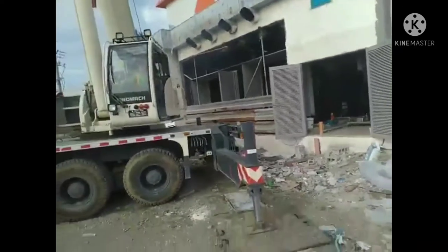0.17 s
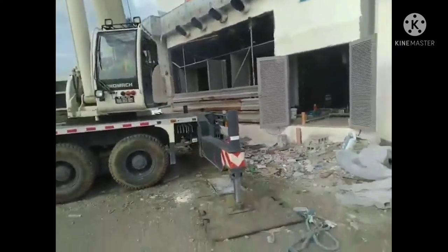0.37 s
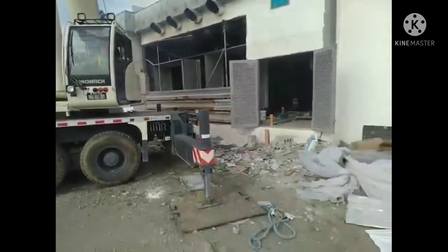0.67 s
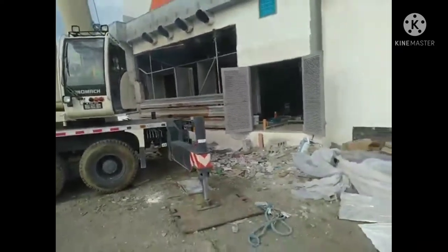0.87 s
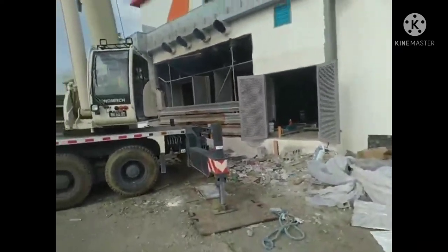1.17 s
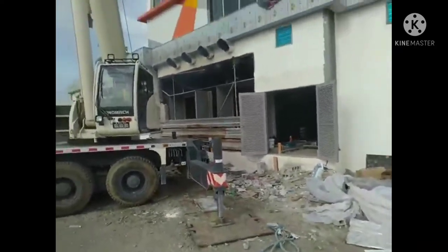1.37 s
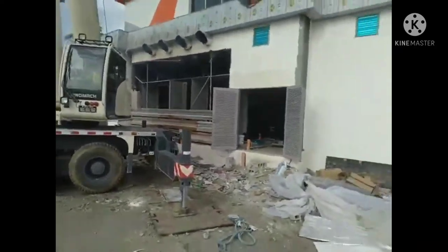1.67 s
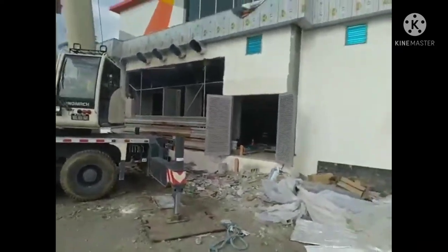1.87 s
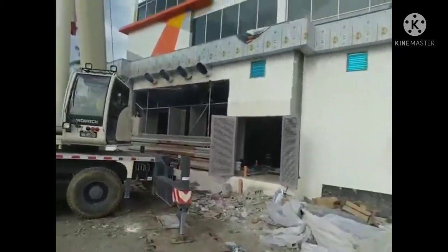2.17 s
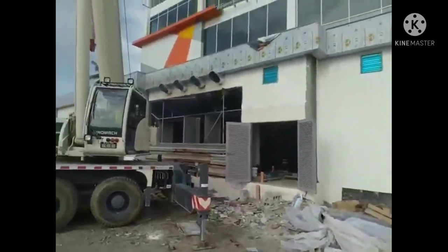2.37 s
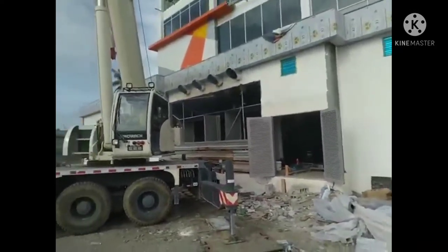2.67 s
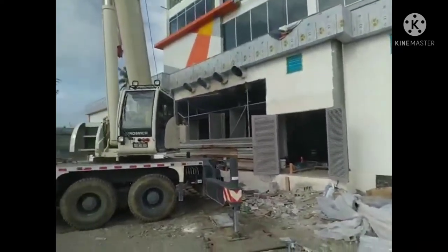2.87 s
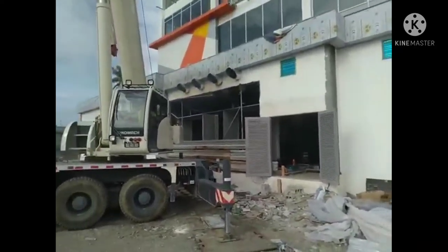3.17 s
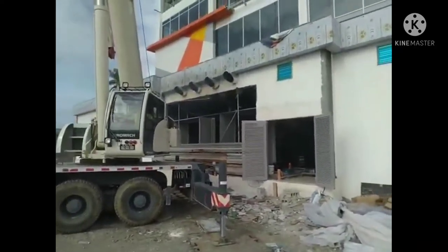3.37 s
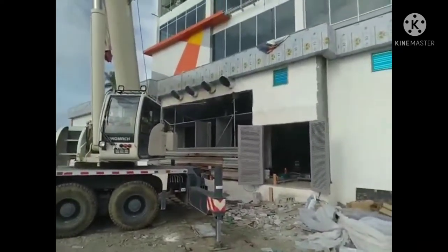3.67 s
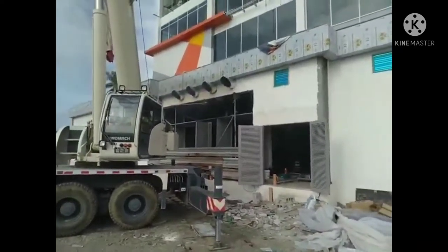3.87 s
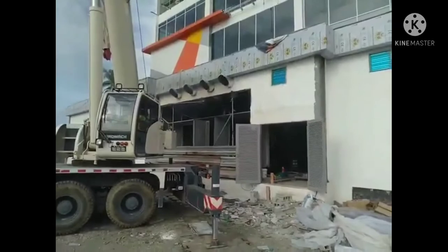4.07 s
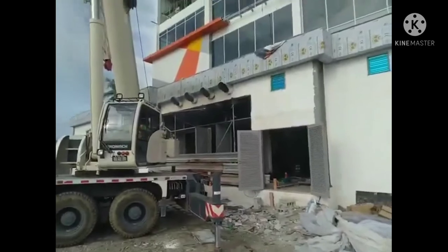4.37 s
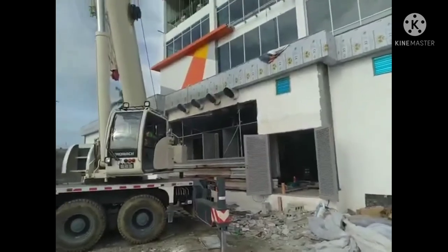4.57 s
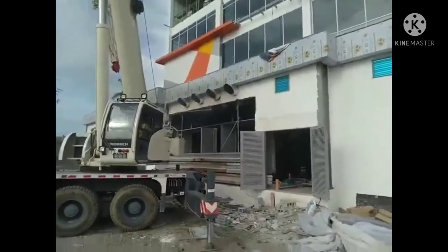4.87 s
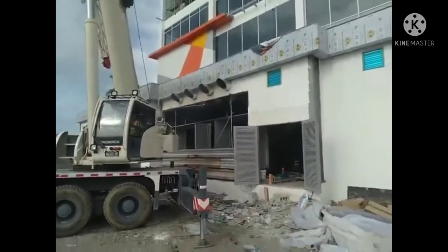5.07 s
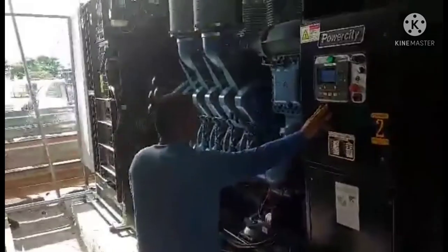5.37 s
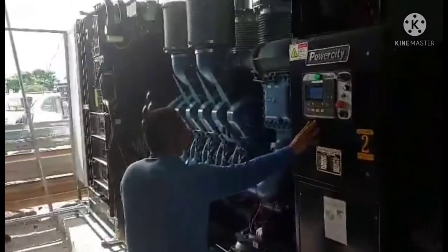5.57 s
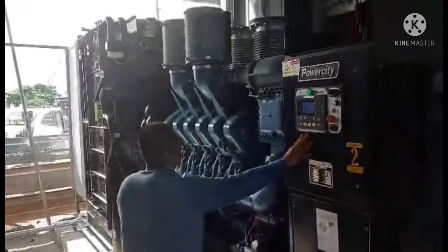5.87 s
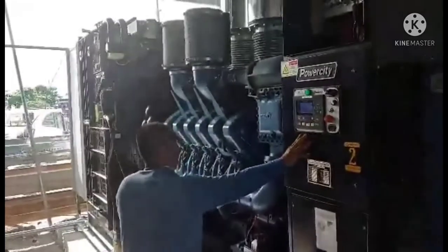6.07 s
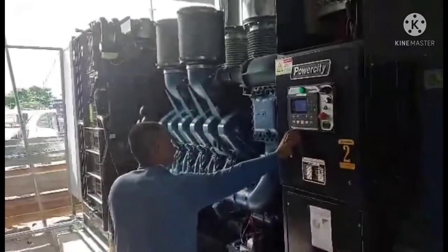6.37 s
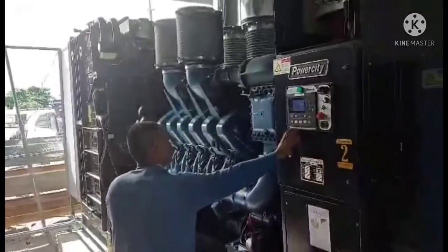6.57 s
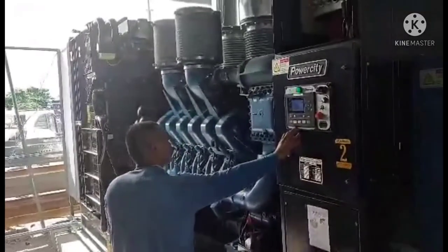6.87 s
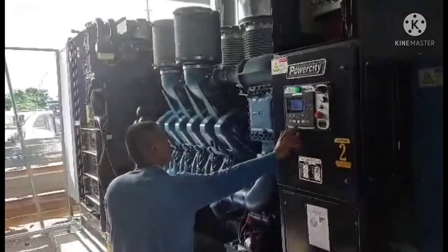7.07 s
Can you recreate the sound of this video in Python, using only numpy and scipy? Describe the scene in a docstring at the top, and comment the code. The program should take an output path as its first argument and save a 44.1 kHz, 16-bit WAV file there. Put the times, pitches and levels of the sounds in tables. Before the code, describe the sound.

A continuous fast diesel drone with blurred firing pulses fills a yard, mixed with fan hum and soft airy hiss, its middle tones swelling and thinning as the listener shifts position. Then a hard change, barely overlapped: a large engine idling at arm's length indoors, wider and brighter, its metallic clatter and ticking repeating every cycle over low rumble and blowing air until the end.

```python
"""Plant yard, then engine room: a diesel generator throbs behind open doors, heard from the yard with its fans;
then the scene changes to a big diesel idling at arm's length, its clatter repeating with every cycle.
Tones locked to the crank make the exhaust and block lines; free-running tones make the fans and gears.
Shaped noise makes gas and air, its level pulsed by firings or strokes; one looped noise cycle makes the clatter.
"""
import sys
import numpy as np
from scipy import signal
from scipy.fft import rfft, irfft
from scipy.io import wavfile
from scipy.ndimage import uniform_filter1d

SR = 44100
rng = np.random.default_rng(int(sys.argv[2]) if len(sys.argv) > 2 else 0)


def store_wav(level_fs):
    """Save 16-bit WAV to argv[1]."""
    pcm = np.round(np.clip(np.atleast_2d(level_fs), -1, 1) * 32767)
    wavfile.write(sys.argv[1], SR, pcm.T.astype(np.int16))


N = 318402

# Source levels below are relative: envelopes and mix gains follow.
YARD_CYCLE_HZ, HALL_CYCLE_HZ = 15.0, 6.667  # four-stroke cycles at 1800 and 800 rpm

# Exhaust lines: (multiple of cycle rate, level in line with doors [dB], change furthest aside [dB])
YARD_EXHAUST_LINES = [(2, -52, 1.5), (3, -38.5, 1), (4, -25.5, -2.5), (5, -32, 0), (6, -23.5, 0),
                      (7, -31.5, -1.5), (8, -21.5, -8), (9, -18, 4.5), (12, -31, -5.5), (13, -34, -2.5),
                      (14, -20, -9), (15, -30.5, 3.5), (16, -29.5, -1), (17, -30, -14), (18, -37, 0),
                      (20, -32, -4.5), (21, -26.5, .5), (22, -39.5, 3), (23, -38, 2.5), (26, -45, -2),
                      (30, -33, -5.5), (31, -34.5, 0), (32, -38.5, -2), (33, -41.5, 2), (35, -38, -1.5),
                      (43, -43.5, 0)]
# Engine block lines: (multiple of cycle rate, level [dB])
HALL_BLOCK_LINES = [(6, -35.5), (9, -46), (15, -36), (16, -24), (17, -24), (18, -18), (20, -31),
                    (22, -27.5), (24, -31), (26, -36), (27, -33), (34, -41), (36, -20), (42, -26.5),
                    (45, -30.5), (48, -21.5), (49, -27.5), (51, -30), (58, -31), (63, -42), (67, -37),
                    (72, -33.5), (76, -28), (81, -34), (90, -42), (108, -32), (110, -37), (117, -39),
                    (123, -37), (126, -29.3), (138, -40), (160, -38), (166, -32), (174, -34.5), (198, -38)]
# Delay in pipes and walls: (lag [cycles], further lag per multiple [cycles])
YARD_DELAY_CYCLES = (.08, .213)
HALL_DELAY_CYCLES = (.5, .3333)
# Fan hum: (frequency [Hz], level [dB])
YARD_FAN_TONES = [(192, -24), (384, -39)]
HALL_FAN_TONES = [(67.5, -32), (85.5, -25.5)]
# Gear whine: (frequency [Hz], level [dB])
YARD_GEAR_TONES = [(959, -46), (1080, -45.5), (1158, -41.5), (1319, -58.5), (1692, -54)]
# Turbulent gas and air: (frequency [Hz], density [dB per Hz])
YARD_ROAR_SPECTRUM = [(32, -75), (75, -47), (115, -46.5), (148, -39), (175, -48.5), (260, -47.5),
                      (335, -42.5), (420, -53.5), (690, -48.5), (850, -54.5), (1400, -60), (1900, -66),
                      (2850, -65.5), (3500, -76.5), (4700, -80), (7700, -101), (12500, -100)]
HALL_AIR_SPECTRUM = [(28, -62), (70, -42.5), (150, -40), (205, -43), (270, -42.5), (320, -42), (450, -50.5),
                     (900, -55), (1300, -55.5), (1650, -60), (1950, -58), (2600, -56.5), (3500, -63.5),
                     (4700, -68), (7000, -71), (12000, -81)]
# Gear and injector rattle in the yard: (frequency [Hz], density [dB per Hz])
YARD_CLATTER_SPECTRUM = [(200, -76), (400, -54.5), (600, -58.5), (850, -61), (1400, -69), (2700, -75),
                         (3600, -104.5)]
# Valve gear and combustion knock: (frequency [Hz], density [dB per Hz])
HALL_CLATTER_SPECTRUM = [(28, -71.5), (70, -59), (160, -54), (300, -54), (420, -49.5), (600, -48),
                         (800, -49.5), (950, -49), (1150, -52.5), (1340, -52), (1600, -62.5), (1950, -59.5),
                         (2300, -60), (2600, -61.5), (4000, -76.5)]
# Covers and pipes that ring in the noise: (frequency [Hz], width [Hz], lift [dB])
YARD_COVER_RINGS = [(492, 80, 4.5), (1663, 73, 4), (2136, 240, 4), (6220, 620, 4.5), (10440, 1950, 6.5)]
HALL_COVER_RINGS = [(1950, 100, 6.1), (2576, 120, 3.4), (2635, 78, 3.2), (4080, 740, 4.1), (5200, 440, 2.9),
                    (6350, 450, 2.8), (10600, 3600, 5.2)]
# Stereo field: (frequency [Hz], side minus mid [dB], left minus right [dB])
YARD_STEREO = [(35, -18, 0), (55, -14, 0), (95, -28, .2), (160, -27, 0), (250, -23, .2), (340, -16, .5),
               (470, -13.5, .5), (620, -17, .5), (880, -12, 1), (1170, -6, 2), (1700, -2, 4),
               (2400, -2.5, 4.5), (3900, 0, 4), (12000, 0, 4)]
HALL_STEREO = [(60, -17, 2.2), (120, -15.5, 2.4), (165, -11.5, 2.5), (240, -14, 2.5), (330, -14.5, 2.5),
               (450, -9.5, 2.5), (600, -6, 2.5), (840, -5.5, 2.8), (1250, .5, 3.2), (2200, -1, .5),
               (5000, 0, -1.4), (11000, .3, 1.4)]
EXHAUST_STEREO = [(45, -32, .2), (135, -43, .2), (210, -31, .2), (320, -18, .3), (500, -14, .5)]  # low lines reach both ports alike
# Strength of the six knocks of a cycle: (strength [dB])
YARD_KNOCK_SIZES_DB = [11, 13, -13, -21.5, 2.5, -1.5]
# Valve and injector strokes: (share of cycle, strength in mids [dB], strength in treble [dB])
HALL_STROKE_ANGLES = [(.006, 7, -9), (.158, 2, -9), (.33, 1, 1), (0.485, -1, 11), (.59, -1, -1),
                      (.68, -12, 6), (.845, 8, -9), (.965, 1, -12)]
# Listener steps aside and part of the way back: (time [s], 0 in line with doors to 1 furthest aside)
LISTENER_ASIDE = [(0, 0.12), (.8, 0.059), (2.2, 0.77), (4.3, 0.89), (5.4, 0.53)]
# Gain at the two listener positions: (in line [dB], furthest aside [dB])
ROAR_ASIDE_DB = (1.05, -2.5)
WHINE_ASIDE_DB = (5, -1)
HUM_ASIDE_DB = (1.5, 2.8)
# Yard treble gain: (time [s], level [dB])
YARD_TREBLE_LEVEL = [(0, 0), (1.3, -0.4), (2.2, -1.7), (3.3, -1.5), (4.7, -0.6), (5.4, 0.7)]
# Resonant bands: (frequency [Hz], width [Hz])
YARD_LIFT_BANDS = [(372, 49), (485, 96), (755, 140), (2080, 910)]
HALL_LIFT_BANDS = [(1960, 250), (2620, 370)]
# Band levels as the listener moves: (time [s], then level [dB] of each of four bands, low to high)
YARD_LIFT_LEVELS = [(0, -5, 2.5, -6, -2), (1.2, 1.5, 4.5, -5, -0.5), (2.1, -1.5, 3.5, -1, -2.5),
                    (3.1, 0, -1, 2, 1), (4.5, 9.5, -6.5, 2.5, 1), (5.4, -1, 1.5, 1.5, 1)]
# Ringing band levels: (time [s], lower band level [dB], upper band level [dB])
HALL_LIFT_LEVELS = [(5.5, 0, -7), (5.66, -2, 6.5), (5.92, -2, -4), (6.06, 2, 9), (6.24, 1, -7), (6.5, 0, 4),
                    (6.62, 0, 1), (6.88, 1, 3), (7.2, 3, -7)]
# Brief swell of fan hum: (time [s], half length [s], lift [dB])
YARD_HUM_SWELL = (0.31, 0.15, 5.6)
# Brief swells of engine room rumble: (time [s], half length [s], lift [dB])
HALL_RUMBLE_SWELLS = [(5.57, 0.025, 9.5), (6.25, 0.18, 6)]
# Faint, brief hiss: (time [s], half length [s], frequency [Hz], width [Hz], level [dB])
YARD_WISP = (2.23, .09, 6050, 450, -48.5)

GEAR_HUNT_SHARE, GEAR_WAVER_SHARE, GEAR_FLUTTER_HZ = .0016, .5, 18
YARD_TREBLE_THROB, HALL_RATTLE_THROB, HALL_CLATTER_THROB = .55, .95, .5  # exponents on the envelopes
YARD_GRAIN_DB, HALL_AIR_FLICKER_DB, HALL_RATTLE_FLICKER_DB = .8, .6, 1.3
STROKE_DECAY_S, STROKE_SCATTER_DB = .006, 2
HALL_RUMBLE_DB, HALL_TREBLE_DB = -.2, -.7
CUT_S, CUT_RISE_S = 5.505, .024
LEAD_S, LEAD_RISE_S, LEAD_DB = .089, .03, -12  # engine room is softly audible before the cut
YARD_HOLD_S, YARD_FADE_DB_PER_S = .03, 194
YARD_DB, HALL_DB = -2, -2.5
TOP_HZ = 12900


def undb(db):
    """Decibels to gain."""
    return 10 ** (np.asarray(db) / 20)


def curves(table):
    """Each column of a time table, sample by sample."""
    time_s, *columns = np.transpose(table)
    return [np.interp(np.arange(N) / SR, time_s, c) for c in columns]


def at(hz, table):
    """Each column of a frequency table, read on a log axis."""
    points_hz, *columns = np.transpose(table)
    return [np.interp(np.log(hz + 1e-6), np.log(points_hz), c) for c in columns]


def walk(rate_hz):
    """Random levels held 1 / rate_hz and slewed twice; spread near 1."""
    hold = int(SR / rate_hz)
    steps = np.repeat(rng.standard_normal(N // hold + 2), hold)
    slewed = uniform_filter1d(uniform_filter1d(steps, hold), hold)
    return 1.3 * slewed[:N]


def swell(centre_s, half_length_s, lift_db):
    """Smooth rise and fall of level, in dB."""
    return lift_db * np.exp(-((np.arange(N) / SR - centre_s) / half_length_s) ** 2)


def ramp(start_s, length_s):
    """Straight rise from 0 to 1."""
    return np.clip((np.arange(N) / SR - start_s) / length_s, 0, 1)


def aside_gain(ends_db, aside):
    """Gain that follows the listener from in line with the doors to furthest aside."""
    in_line_db, aside_db = ends_db
    return undb(in_line_db + (aside_db - in_line_db) * aside)


def ports(mid, side, hz, field):
    """Left and right from a shared part and a diffuse part."""
    side_db, pan_db = at(hz, field)
    side = side * undb(side_db)
    return np.array([(mid + side) * undb(pan_db / 2), (mid - side) * undb(-pan_db / 2)])


def colour(pair, spectrum, rings, field):
    """Shape two white signals with a spectrum and resonances; spread them over both ports."""
    hz = np.arange(N // 2 + 1) * SR / N
    db = at(hz, spectrum)[0]
    for centre_hz, width_hz, lift_db in rings:
        db = db + lift_db / (1 + (2 * (hz - centre_hz) / width_hz) ** 2)
    mid, side = rfft(pair) * undb(db) * np.sqrt(SR / 2)
    return irfft(ports(mid, side, hz, field), N)


def split(pair, hz):
    """Parts of a sound below and above a frequency."""
    low = signal.sosfiltfilt(signal.butter(2, hz, fs=SR, output="sos"), pair)
    return low, pair - low


def resonate(pair, hz, width_hz):
    """Pass one resonant band."""
    return signal.lfilter(*signal.iirpeak(hz, hz / width_hz, fs=SR), pair)


def lift_bands(pair, bands, levels):
    """Raise or lower each band by its own level curve."""
    for (hz, width_hz), db in zip(bands, curves(levels)):
        pair = pair + (undb(db) - 1) * resonate(pair, hz, width_hz)
    return pair


def scatter(pair, longest_s, share, count):
    """Fixed reflections off nearby surfaces, different at each port, ripple the spectrum."""
    lags = (rng.uniform(.1, 1, (2, count)) * longest_s * SR).astype(int)
    reflected = np.array([sum(np.roll(x, lag) for lag in row) for x, row in zip(pair, lags)])
    return (pair + share * reflected / np.sqrt(count)) / np.hypot(1, share)


def crank(hz, hunt):
    """Turns so far at a speed that hunts a little; hunt is a share of speed."""
    return np.cumsum(hz * (1 + hunt * walk(5))) / SR


def tone(turns, hz, db, field, waver, flutter_hz=6):
    """One line; reflections make it waver and reach the ports at any phase."""
    diffuse = np.exp(2j * np.pi * rng.random())
    wavering = 1 + waver * (walk(flutter_hz) + 1j * walk(flutter_hz))
    line = np.sqrt(2) * undb(db) * np.exp(2j * np.pi * turns) * wavering
    return ports(line.real, (line * diffuse).real, hz, field)


def order_line(turns, multiple, cycle_hz, db, delay, field, waver):
    """Line locked to the crank; the lag grows with the multiple."""
    multiple = round(multiple)
    lag, further_lag = delay
    delayed = turns - lag - further_lag * multiple
    return tone(multiple * delayed, multiple * cycle_hz, db, field, waver)


def knocks(turns, sizes_db, decay, depth):
    """Unit-power envelope: each firing swells the noise, then decays; decay is a share of the interval."""
    firing = turns * len(sizes_db)
    size = undb(sizes_db)[firing.astype(int) % len(sizes_db)]
    envelope = 1 + depth * size * np.exp(-(firing % 1) / decay)
    return envelope / np.sqrt(np.mean(envelope ** 2))


def strokes(turns, sizes_db, depth):
    """Unit-power envelope: parts strike at fixed crank angles and ring briefly, a little unevenly."""
    envelope = 1
    for (angle, *_), db in zip(HALL_STROKE_ANGLES, sizes_db):
        since = turns - angle + 1
        cycle_sizes = undb(db + STROKE_SCATTER_DB * rng.standard_normal(64))
        size = cycle_sizes[since.astype(int)]
        envelope = envelope + depth * size * np.exp(-(since % 1) / HALL_CYCLE_HZ / STROKE_DECAY_S)
    return envelope / np.sqrt(np.mean(envelope ** 2))


def impacts(turns, cycle_hz, orders):
    """One cycle of dense impacts, looped; its mid part leaves room for the strong lines."""
    size = 2 * int(SR / cycle_hz / 2)
    lines = np.exp(2j * np.pi * rng.random((2, size // 2 + 1)))
    lines[0, [round(k) for k, *_ in orders]] = 0
    cycles = irfft(lines) * np.sqrt(size)
    return np.array([np.interp(turns % 1 * size, np.arange(size), cycle) for cycle in cycles])


def wisp(centre_s, half_length_s, hz, width_hz, db):
    """Narrow noise band that swells and fades as a faint hiss."""
    band = resonate(rng.standard_normal((2, N)), hz, width_hz)
    return undb(db) * band / band.std() * np.exp(-((np.arange(N) / SR - centre_s) / half_length_s) ** 2)


def yard_clatter(turns, throb):
    """Gear and injector rattle: looped impacts, pulsed by firings and roughened at random."""
    grain = undb(YARD_GRAIN_DB * walk(120))
    pulsed = impacts(turns, YARD_CYCLE_HZ, YARD_EXHAUST_LINES) * throb * grain
    return colour(pulsed, YARD_CLATTER_SPECTRUM, YARD_COVER_RINGS, YARD_STEREO)


def yard_noise(turns, aside):
    """Turbulent gas and rattle pulsed by the firings."""
    throb = knocks(turns, YARD_KNOCK_SIZES_DB, decay=.51, depth=.16)
    white = rng.standard_normal((2, N))
    low, treble = split(colour(white, YARD_ROAR_SPECTRUM, YARD_COVER_RINGS, YARD_STEREO), hz=1490)
    rumble, body = split(low * uniform_filter1d(throb, size=150), hz=370)
    # cooling air flows on between firings, so the treble throbs less
    treble = scatter(treble * throb ** YARD_TREBLE_THROB, longest_s=.015, share=.47, count=8)
    treble = treble * undb(curves(YARD_TREBLE_LEVEL)[0])
    beamed = (body + yard_clatter(turns, throb)) * aside_gain(ROAR_ASIDE_DB, aside)
    return rumble + lift_bands(beamed + treble, YARD_LIFT_BANDS, YARD_LIFT_LEVELS)


def yard_fans(aside):
    """Wavering fan tones with one brief swell."""
    hum = sum(tone(crank(hz, hunt=.0014), hz, db, YARD_STEREO, waver=.19) for hz, db in YARD_FAN_TONES)
    return hum * aside_gain(HUM_ASIDE_DB, aside) * undb(swell(*YARD_HUM_SWELL))


def yard_gears(aside):
    """Gear whine, unsteady in pitch and level, beamed by the doors."""
    whine = sum(tone(crank(hz, GEAR_HUNT_SHARE), hz, db, YARD_STEREO, GEAR_WAVER_SHARE, GEAR_FLUTTER_HZ)
                for hz, db in YARD_GEAR_TONES)
    return whine * aside_gain(WHINE_ASIDE_DB, aside)


def yard_exhaust(turns, aside):
    """Crank-locked lines standing between walls; each swells or fades as the listener moves."""
    return sum(order_line(turns, k, YARD_CYCLE_HZ, db + change_db * aside,
                          YARD_DELAY_CYCLES, EXHAUST_STEREO, waver=.049)
               for k, db, change_db in YARD_EXHAUST_LINES)


def hall_air(mids, treble):
    """Flickering air noise; strokes pulse the ringing covers and the treble."""
    air = rng.standard_normal((2, N)) * undb(HALL_AIR_FLICKER_DB * walk(25))
    low, high = split(colour(air, HALL_AIR_SPECTRUM, HALL_COVER_RINGS, HALL_STEREO), hz=150)
    body, high = split(high, hz=1590)
    rattle, high = split(high, hz=3200)
    rumble = low * undb(HALL_RUMBLE_DB + sum(swell(*row) for row in HALL_RUMBLE_SWELLS))
    rattle = rattle * mids ** HALL_RATTLE_THROB * undb(HALL_RATTLE_FLICKER_DB * walk(60))
    rattle = lift_bands(rattle, HALL_LIFT_BANDS, HALL_LIFT_LEVELS)
    high = scatter(high * treble, longest_s=.014, share=.97, count=12)
    return rumble + body + rattle + high * undb(HALL_TREBLE_DB)


def hall_fans():
    """Wavering fan tones with independent speed hunt."""
    return sum(tone(crank(hz, hunt=.0019), hz, db, HALL_STEREO, waver=.18) for hz, db in HALL_FAN_TONES)


def hall_clatter(turns, mids):
    """Valve gear and combustion knock: looped impacts partly following the strokes."""
    pulsed = impacts(turns, HALL_CYCLE_HZ, HALL_BLOCK_LINES) * mids ** HALL_CLATTER_THROB
    return colour(pulsed, HALL_CLATTER_SPECTRUM, HALL_COVER_RINGS, HALL_STEREO)


def hall_block(turns):
    """Crank-locked lines of the engine block."""
    return sum(order_line(turns, k, HALL_CYCLE_HZ, db, HALL_DELAY_CYCLES, HALL_STEREO, waver=.023)
               for k, db in HALL_BLOCK_LINES)


def yard():
    """Running generator from outside: noise, hiss, fans, gears and exhaust."""
    aside = curves(LISTENER_ASIDE)[0]
    turns = crank(YARD_CYCLE_HZ, hunt=.000694)
    background = yard_noise(turns, aside) + wisp(*YARD_WISP)
    return background + yard_fans(aside) + yard_gears(aside) + yard_exhaust(turns, aside)


def engine_room():
    """Idling diesel from close by: air, fans, clatter and block lines."""
    turns = crank(HALL_CYCLE_HZ, hunt=.00042)
    _, mids_db, treble_db = np.transpose(HALL_STROKE_ANGLES)
    mids = strokes(turns, mids_db, depth=.59)
    treble = strokes(turns, treble_db, depth=.46)
    return hall_air(mids, treble) + hall_fans() + hall_clatter(turns, mids) + hall_block(turns)


def scene():
    """Yard gives way to engine room; the two overlap for a moment."""
    fading_s = np.maximum(np.arange(N) / SR - CUT_S - YARD_HOLD_S, 0)
    yard_gain = undb(YARD_DB - YARD_FADE_DB_PER_S * fading_s)
    lead_in = undb(LEAD_DB) * ramp(CUT_S - LEAD_S, LEAD_RISE_S)
    hall_gain = undb(HALL_DB) * np.maximum(lead_in, ramp(CUT_S, CUT_RISE_S))
    return yard() * yard_gain + engine_room() * hall_gain


def record(dry):
    """Round peaks near full scale, then low-pass steeply at TOP_HZ."""
    rounded = dry / (1 + dry ** 8) ** (1 / 8)
    return signal.sosfilt(signal.ellip(10, .2, 70, TOP_HZ, fs=SR, output="sos"), rounded)


dry = scene()
out = record(dry)
store_wav(out)
```